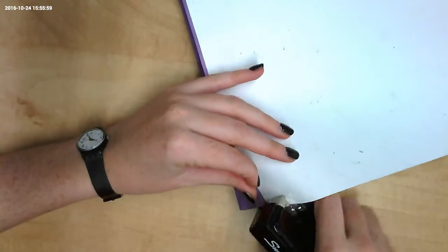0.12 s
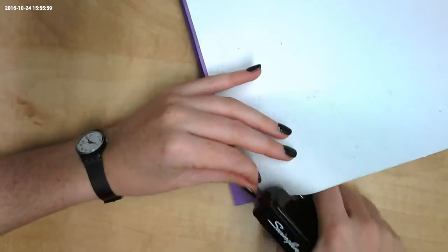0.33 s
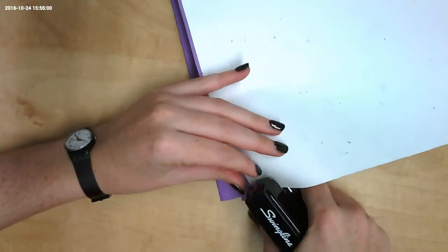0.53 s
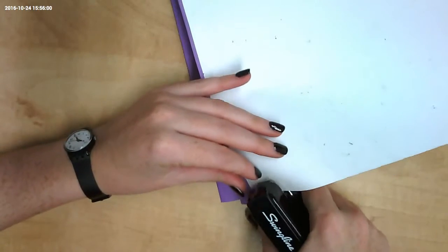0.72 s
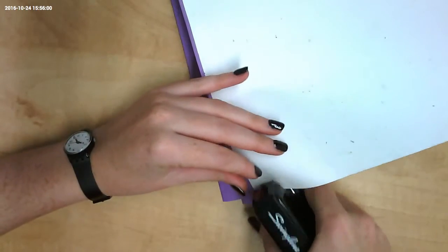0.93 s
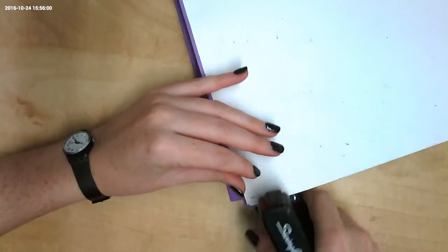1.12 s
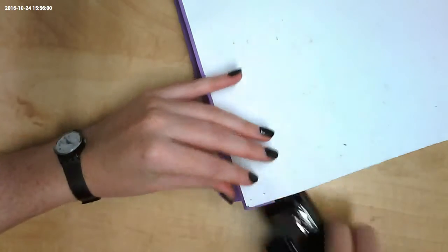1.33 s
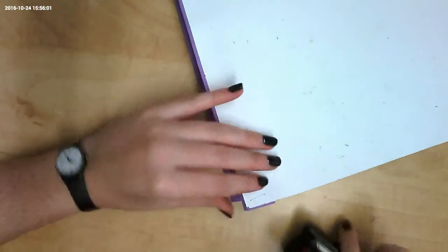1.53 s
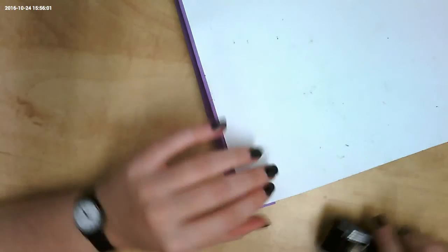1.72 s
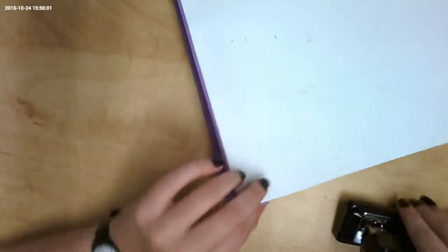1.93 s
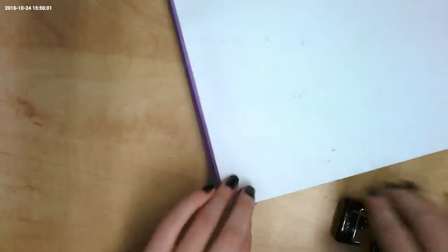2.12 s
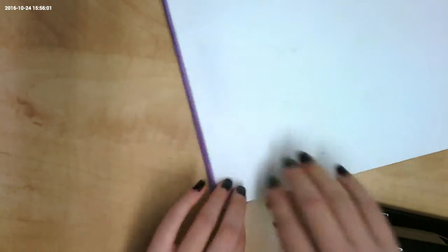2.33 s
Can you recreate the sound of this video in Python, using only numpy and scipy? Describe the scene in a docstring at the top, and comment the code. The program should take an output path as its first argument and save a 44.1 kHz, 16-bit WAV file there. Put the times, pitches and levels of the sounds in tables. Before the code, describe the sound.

One hard stapler crunch, a light springy rattle, then the stapler knocks down on the table

```python
"""A desk stapler on a wooden table in a small room, over ventilation noise and a wavering low hum.
The arm is pushed down, the staple snaps through the paper (0.44 s), the arm springs back and rattles (1.05 s);
the stapler slides off the sheet with a soft hiss and is put down (1.9 to 2.1 s).
Each contact sums decaying table modes, a knock, ringing steel and a noisy rattle; the room adds a noise tail.
Slide, air and hum are shaped noise."""
import sys
import numpy as np
from scipy import signal
from scipy.fft import rfft, irfft
from scipy.io import wavfile

SR = 44100
rng = np.random.default_rng(int(sys.argv[2]) if len(sys.argv) > 2 else 0)


def bounce(signal):
    """Save signal as a 16-bit WAV file at the path given by the first command-line argument."""
    frames = np.transpose(np.atleast_2d(signal))
    limited = np.clip(frames, -1, 1)
    pcm = np.round(limited * 32767).astype(np.int16)
    wavfile.write(sys.argv[1], SR, pcm)


N = 105840


def from_db(db):
    """Amplitude gain of a level in dB."""
    return 10 ** (np.asarray(db) / 20)


def rms_one(x):
    """Scale to rms 1."""
    return x / np.sqrt(np.mean(x ** 2) + 1e-20)


def at_hz(points, hz, column=1):
    """Read a table column, linear over log frequency."""
    points = np.array(points)
    return np.interp(np.log(hz), np.log(points[:, 0]), points[:, column])


def in_time(rows):
    """Gain curve over the scene from (t/s, level/dB) rows."""
    time_s, level_db = np.transpose(rows)
    return from_db(np.interp(np.arange(N) / SR, time_s, level_db))


def filtered(x, order, hz, kind):
    """Butterworth filter."""
    return signal.sosfilt(signal.butter(order, hz, kind, fs=SR, output="sos"), x)


def clicks(per_s, t):
    """Random clicks of uneven size and sign; mean power 1."""
    size = rng.standard_normal(len(t))
    present = rng.random(len(t)) < per_s / SR
    return size * present * np.sqrt(SR / per_s)


def onset(t, time_constant_s):
    """Exponential rise from 0 to 1."""
    return 1 - np.exp(-t / time_constant_s)


def struck(modes, t, swell_cycles=0, detune=0):
    """Modes ringing after one unit blow: decaying sines, all starting in the same direction."""
    scatter_db = 1.5
    hz, db, t60_s = np.transpose(modes)[:, :, None]
    db = db + scatter_db * rng.standard_normal(db.shape)
    hz = hz * (1 + detune * rng.standard_normal(hz.shape))
    swell = onset(t, swell_cycles / hz) if swell_cycles else 1
    ringing = from_db(db - 60 * t / t60_s) * np.sin(2 * np.pi * hz * t)
    return np.sum(swell * ringing, axis=0)


def stapler():
    """Each contact sums thud, boom, knock, clatter and rattle, dulled by its softness."""
    # contacts: t/s, boom/dB, thud/dB, knock/dB, knock f/Hz, knock t60/s,
    #           steel clatter/dB, rattle/dB, hardness f/Hz, clatter and rattle t60/s
    contacts = [(0.078, -100, -57, -29.5, 1500, 0.0043, -83, -39.5, 8700, 0.12),
                (0.2143, -29, -10, 6, 1504, 0.0026, -69, -24, 7900, 0.014),
                (0.2145, -63, -51.5, -15.5, 323, 0.18, -68.5, -4, 3700, 0.071),
                (0.2221, -63, -49, -2, 894, 0.01, -72, -26, 3500, 0.08),
                (0.2254, -75, -48, -9, 1140, 0.019, -73, -10, 2800, 0.12),
                (0.257, -59, -19, -38, 684, 0.023, -71, -39.5, 3960, 0.035),
                (0.4357, -60, -54, -12, 1530, 0.0041, -64, -31, 4900, 0.0084),
                (0.4376, -15, -13, 4.5, 1820, 0.004, -8, 9, 8000, 0.0063),
                (0.4404, -50, -19.5, 10.5, 1072, 0.015, -13, 12, 5100, 0.035),
                (0.4481, -41, -18.5, 7, 1526, 0.0098, -18, -2, 9260, 0.014),
                (0.4549, -24.5, -16, -1.5, 1196, 0.02, -40, -14, 8000, 0.014),
                (0.4566, -57, -63, -1, 4140, 0.0068, -48, -5, 4860, 0.017),
                (0.4642, -43.5, -30, -4, 1412, 0.04, -64, -10, 4300, 0.18),
                (1.048, -47, -39.5, -15, 915, 0.0053, -57, -39, 2480, 0.029),
                (1.089, -77, -75, -26.5, 2410, 0.048, -52, -29, 4550, .04),
                (1.099, -70, -73, -29, 3350, 0.023, -50, -38, 12100, 0.05),
                (1.1022, -60, -64, -15.5, 3350, 0.013, -32, -9, 14200, 0.029),
                (1.108, -70, -77, -21, 1080, 0.023, -45, -22, 13300, 0.049),
                (1.1135, -76, -67, -43, 3300, .015, -22, -37, 14400, 0.011),
                (1.117, -61, -67, -13, 2470, 0.009, -34.5, -19.5, 12900, 0.13),
                (1.122, -70, -65, -24, 3460, 0.023, -43, -28, 7000, 0.02),
                (1.127, -70, -63, -22, 3000, 0.018, -43, -24.5, 7900, 0.11),
                (1.132, -67, -68, -25, 3500, .02, -48, -33, 7000, 0.0527),
                (1.149, -77, -66, -26, 3270, 0.014, -54, -34, 7000, .04),
                (1.2963, -74, -83, -18, 2000, 0.0039, -55, -33.5, 12600, 0.038),
                (1.3065, -73, -61, -60, 3000, .006, -48, -55, 13900, 0.029),
                (1.8823, -22, -17, -1.5, 1095, 0.016, -44, -12.5, 4300, 0.04),
                (1.883, -68, -30, -7, 440, 0.022, -25.5, -32, 6140, 0.021),
                (1.8855, -70, -70, -15.5, 3620, 0.038, -47, -30, 6100, 0.019),
                (1.8873, -43, -64, -16, 2260, 0.022, -30, -19, 10540, 0.12),
                (2.066, -94, -48, -35.5, 3560, 0.02, -82, -32, 5150, 0.15),
                (2.1031, -63, -58, -21.5, 1160, 0.026, -31.5, -13, 5400, 0.031),
                (2.1229, -37.5, -28.5, -7.5, 586, 0.012, -60, -9, 3080, 0.032),
                (2.125, -58, -34.5, -2, 750, 0.0067, -50, -24, 2980, 0.032),
                (2.134, -65, -66, -15, 494, 0.016, -60, -13.5, 4900, 0.021),
                (2.1292, -58, -32.5, -10, 2664, 0.014, -26.5, -16.5, 7460, 0.092)]
    low_cut_hz = 56  # takes the deepest bass out of all contacts
    out = np.zeros(N + SR)
    t = np.arange(SR // 3) / SR
    for (start_s, boom_db, thud_db, knock_db, knock_hz, knock_t60_s,
         steel_db, rattle_db, hardness_hz, t60_s) in contacts:
        dying = from_db(-60 * t / t60_s)
        contact = from_db(steel_db) * steel_clatter(t, dying)
        contact += from_db(rattle_db) * rattle(t, dying)
        contact += from_db(knock_db) * knock(t, knock_hz, knock_t60_s)
        contact += from_db(thud_db) * table_thud(t)
        contact += from_db(boom_db) * table_boom(t)
        start = int(start_s * SR)
        out[start:start + len(t)] += soften(contact, hardness_hz)
    return filtered(out[:N], 2, low_cut_hz, "high")


def steel_clatter(t, dying):
    """A first blow, then loose staples striking the steel in dying random blows that ring its modes."""
    # steel modes: f/Hz, level/dB, t60/s
    steel_modes = [(2180, -7, .045), (2370, -7, .03), (2620, -8, .02), (2900, -8, .015), (3250, -6, .02),
                   (3620, -5, .03), (4350, -8, .02), (5450, -8, .02), (5950, -8, .02), (6600, -8, .025),
                   (7400, -6, .025), (9750, -2, .02), (11300, -4, .03), (12100, -2, .02)]
    blows_per_s, blow_db = 1000, 3  # rms blow size before decay, re first blow
    detune = 0.02  # relative random pitch spread of each mode, drawn anew per contact
    blows = clicks(blows_per_s, t) * np.sqrt(blows_per_s / SR)
    blows = blows * dying * from_db(blow_db)
    blows[0] = 1
    return signal.fftconvolve(blows, struck(steel_modes, t, detune=detune))[:len(t)]


def rattle(t, dying):
    """Loose staples and spring: dense high-passed clicks in dying clumps."""
    clicks_per_s, low_hz, rise_s = 12000, 754, 0.0003
    grains = clumps(t) * clicks(clicks_per_s, t)
    return dying * onset(t, rise_s) * filtered(grains, 2, low_hz, "high")


def clumps(t):
    """Gain wandering quickly up and down between random knots."""
    spread_db, knot_step_s = 2.5, 0.0015
    knots_s = np.arange(400) * knot_step_s
    wander = np.interp(t, knots_s, rng.standard_normal(len(knots_s)))
    return from_db(spread_db * wander)


def knock(t, hz, t60_s):
    """One decaying sine with a short swell."""
    swell_cycles = 0.47  # time constant
    return from_db(-60 * t / t60_s) * np.sin(2 * np.pi * hz * t) * onset(t, swell_cycles / hz)


def table_thud(t):
    """Table top modes, each slow to start moving, without the deepest bass."""
    # table top modes: f/Hz, level/dB, t60/s
    top_modes = [(162, -17, 0.16), (181, 1.5, 0.2), (227.7, -2, 0.17), (259, 6, 0.078), (332.4, 5, 0.13),
                 (385.3, -2, 0.15), (427.4, -3.5, 0.12), (500.5, -0.5, 0.098), (598, -4, 0.072),
                 (732.3, -5.5, 0.1), (1004, -8, 0.083), (1299, 2, 0.02)]
    swell_cycles, low_hz = 0.48, 150  # swell as time constant
    return filtered(struck(top_modes, t, swell_cycles), 2, low_hz, "high")


def table_boom(t):
    """The whole table heaves, late and low, on slowly swelling modes."""
    # whole-table modes: f/Hz, level/dB, t60/s
    heave_modes = [(62, -18, 0.26), (93, 3, 0.19)]
    swell_cycles = 0.78  # time constant
    return struck(heave_modes, t, swell_cycles)


def soften(x, hardness_hz):
    """A softer contact is duller: a gentle slope, then a steep edge."""
    slope_share = 0.38  # the slope starts at this share of the hardness
    pole = np.exp(-2 * np.pi * slope_share * hardness_hz / SR)
    sloped = signal.lfilter([1 - pole], [1, -pole], x)
    return filtered(sloped, 6, min(hardness_hz, 0.45 * SR), "low")


def slide():
    """Base and hand moving over the sheet: band-passed noise, a soft hiss."""
    # sliding over paper: t/s, level/dB
    slide_levels = [(1.2, -72), (1.32, -73), (1.42, -49), (1.55, -87.5), (1.701, -78), (2.2, -115),
                    (2.3, -69), (2.37, -49.5), (2.4, -71)]
    hiss = filtered(rng.standard_normal(N), 2, [600, 4100], "band")  # Hz
    return in_time(slide_levels) * rms_one(hiss)


def room(x):
    """Dense reflections: a noise tail dying at its own speed in each half-octave band."""
    # reflections: f/Hz, relative level/dB, t60/s
    reflections = [(101, -13, 0.89), (288, 5, 0.31), (1120, 6.5, 0.31), (3460, 5.5, 0.33), (6300, 1, 0.37),
                   (9900, -1.5, 0.2)]
    room_db, build_up_s = -14.5, 0.0018  # level sets the energy of the whole tail
    t = np.arange(SR // 2) / SR
    edges_hz = 60 * 2 ** np.arange(0, 8.5, 0.5)
    white = rng.standard_normal((2, len(t)))
    tail = np.zeros(len(t))
    for k, (low_hz, high_hz) in enumerate(zip(edges_hz, edges_hz[1:])):
        band = filtered(white[k % 2], 2, [low_hz, high_hz], "band")  # neighbours use different noise
        center_hz = np.sqrt(low_hz * high_hz)
        level_db = at_hz(reflections, center_hz)
        t60_s = at_hz(reflections, center_hz, column=2)
        tail += band * from_db(level_db - 60 * t / t60_s)
    tail *= onset(t, build_up_s)
    tail /= np.sqrt(np.sum(tail ** 2))
    return from_db(room_db) * signal.fftconvolve(x, tail)[:N]


def ventilation():
    """Spectrum-shaped air noise plus a wavering hum from narrow-band noise, swelling together."""
    # air spectrum: f/Hz, relative level/dB
    air_spectrum = [(18, -49), (30, -59), (43, -14), (86, -12), (180, -6), (359, -15), (395, -16),
                    (978, -16.5), (1240, -18), (6000, -34.5), (9000, -66), (11700, -114), (19800, -120)]
    # swell of air and hum: t/s, gain/dB
    air_swell = [(0, -5), (.4, -4), (.8, -2), (1.2, 0.5), (1.6, -2.95), (2.4, -1.5)]
    air_db, hum_db = -44.5, -48  # rms, ahead of the swell
    hum_hz, hum_width_hz = 178, 9.3  # width: offset at half amplitude
    hz = np.maximum(np.fft.rfftfreq(N, 1 / SR), 1)
    air = rms_one(irfft(rfft(rng.standard_normal(N)) * from_db(at_hz(air_spectrum, hz)), N))
    resonance = 1 / (1 + ((hz - hum_hz) / hum_width_hz) ** 2)
    hum = rms_one(irfft(rfft(rng.standard_normal(N)) * resonance, N))
    return in_time(air_swell) * (from_db(air_db) * air + from_db(hum_db) * hum)


def scene():
    """Stapler with room reflections, slide and ventilation."""
    near = stapler()
    return (near + room(near) + slide() + ventilation())[None]


def record(dry):
    """Peaks beyond the limit clip, then the top is cut steeply."""
    clip_level, stop_hz = 0.85, 13500  # 70 dB down from stop_hz up
    clipped = np.clip(dry, -clip_level, clip_level)
    return signal.sosfilt(signal.cheby2(12, 70, stop_hz, fs=SR, output="sos"), clipped)


dry = scene()
out = record(dry)
bounce(out)
```